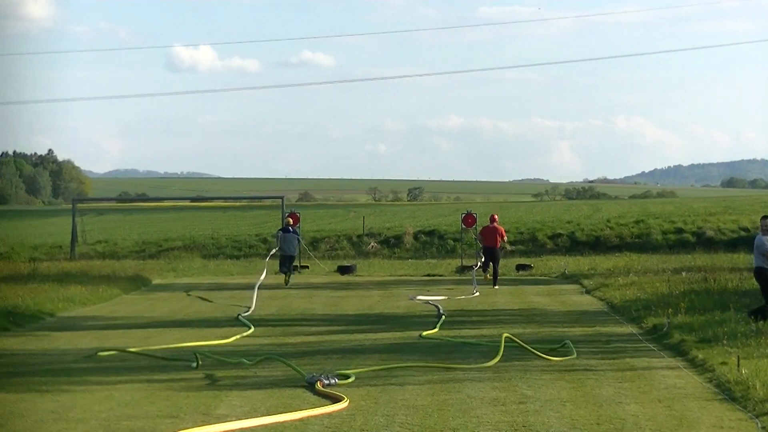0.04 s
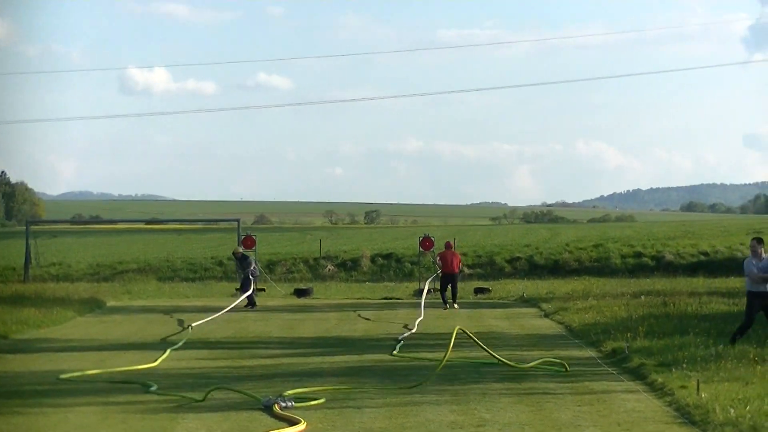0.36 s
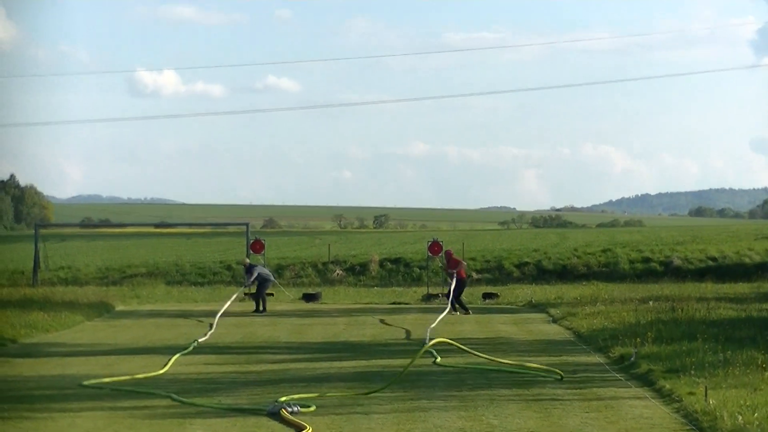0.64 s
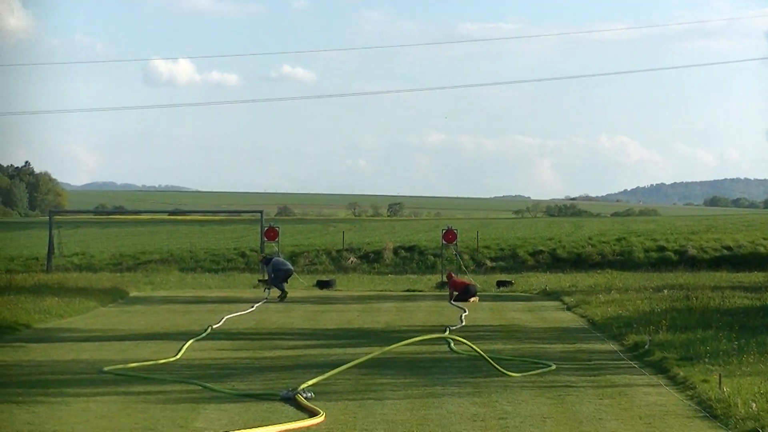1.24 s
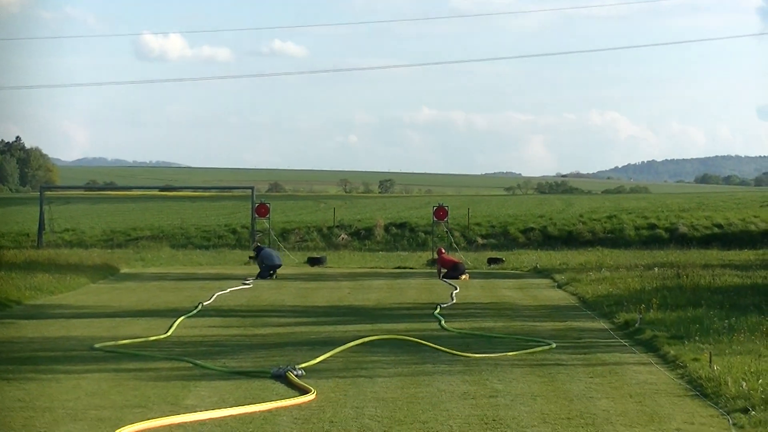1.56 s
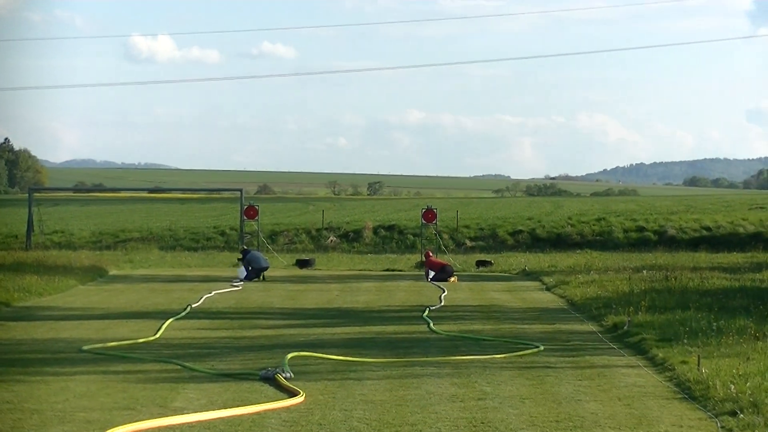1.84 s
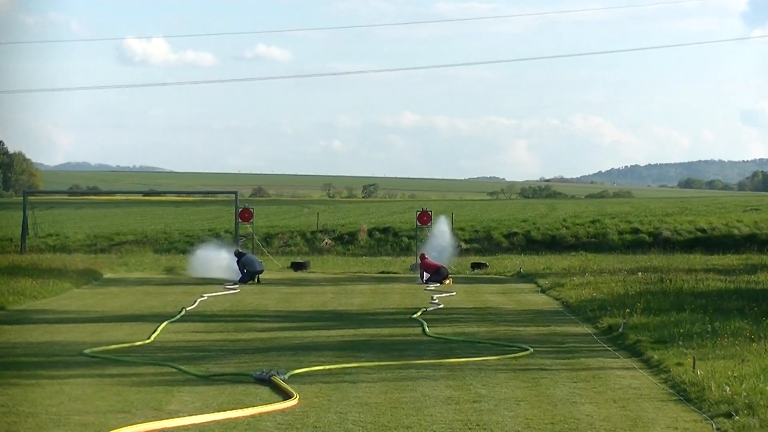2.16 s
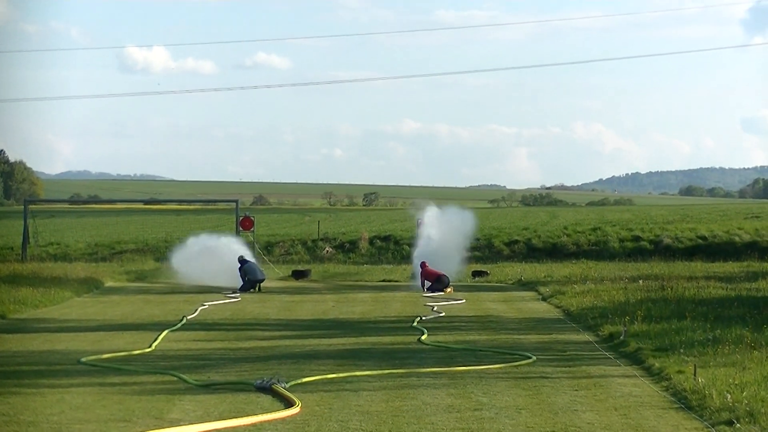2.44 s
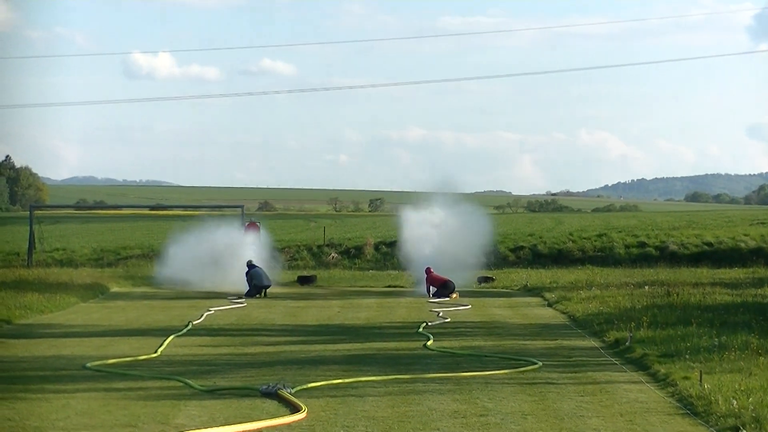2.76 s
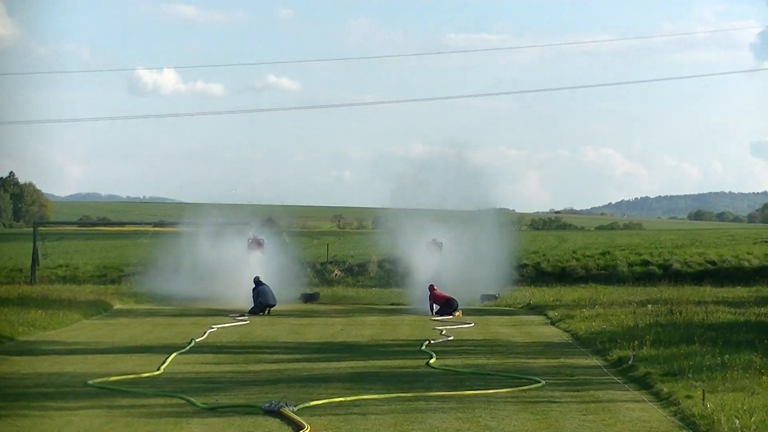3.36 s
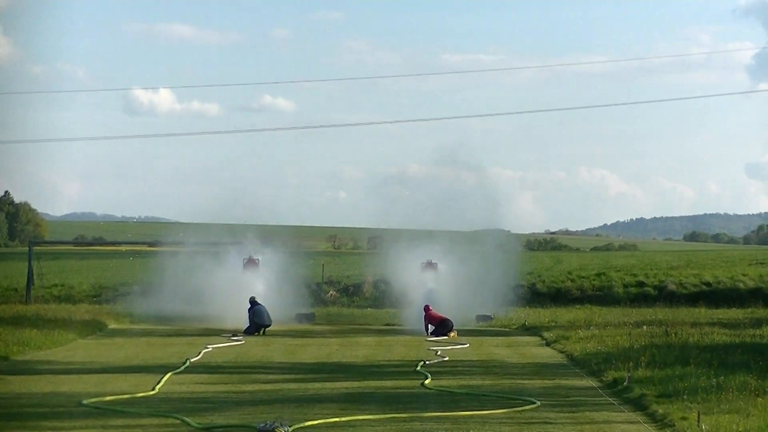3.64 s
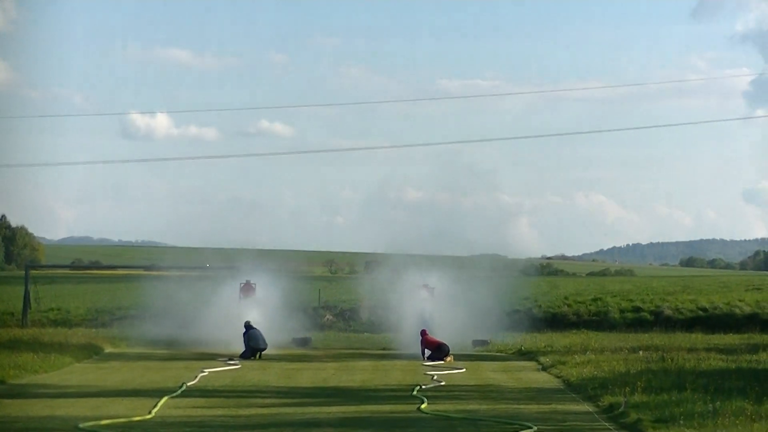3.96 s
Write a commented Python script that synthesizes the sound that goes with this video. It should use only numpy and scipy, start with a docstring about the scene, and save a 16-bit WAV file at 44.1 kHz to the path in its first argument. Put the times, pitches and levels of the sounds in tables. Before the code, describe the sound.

A loud pump engine runs flat out throughout, close by and slightly left, in an open field without echo. Its barely muffled exhaust makes a buzzing drone with rapid metallic crackle, rasp and hiss. For the first 2 seconds it runs a little rough, its pitch wavering and creeping up. From about 2 to 3 seconds the revs climb, then it holds a higher, steadier note until 4 seconds.

```python
"""An open field, the stereo microphone close to a four-cylinder pump engine running flat out through a
barely silenced exhaust. Each firing rings the pipe, with a metallic crack, a rasp of gas inside and a
hiss at the mouth. About two seconds in, as the hoses fill, the revs climb and the firing steadies.
Behind the engine the air carries only a faint low rumble."""
import sys
import numpy as np
from scipy import signal
from scipy.fft import rfft, irfft, next_fast_len
from scipy.io import wavfile

SR = 44100
rng = np.random.default_rng(int(sys.argv[2]) if len(sys.argv) > 2 else 0)


def put_to_file(sound):
    """Save the sound as 16-bit audio at rate SR, in the file named by the first command-line argument."""
    columns = np.atleast_2d(sound).T  # one column per channel
    safe = np.clip(columns, -1, 1)
    whole_steps = np.round(safe * 32767)
    wavfile.write(sys.argv[1], SR, whole_steps.astype(np.int16))


N = 176400
FFT_SIZE = next_fast_len(N + 8192, real=True)
FFT_HZ = np.arange(FFT_SIZE // 2 + 1) * SR / FFT_SIZE


def undb(db):
    """Decibels to gain."""
    return 10 ** (np.asarray(db) / 20)


def level(x, db):
    """Set the rms level."""
    return x * undb(db) / np.sqrt(np.mean(x ** 2))


def curve(table, column):
    """One column of a time table at every sample."""
    rows = np.array(table)
    return np.interp(np.arange(N) / SR, rows[:, 0], rows[:, column])


def colour(x, points, resonances=()):
    """Causal filter through (freq_hz, gain_db) points, with peaks and dips on top."""
    hz, rows = np.maximum(FFT_HZ, 1), np.array(points)
    db = np.interp(np.log(hz), np.log(rows[:, 0]), rows[:, 1])
    for centre, width, gain in resonances:
        db = db + gain / (1 + ((hz - centre) / width) ** 2) ** 1.5
    cepstrum = irfft(np.log(undb(db)), FFT_SIZE)
    cepstrum[1:FFT_SIZE // 2] *= 2  # fold to minimum phase
    cepstrum[FFT_SIZE // 2 + 1:] = 0
    return irfft(rfft(x, FFT_SIZE) * np.exp(rfft(cepstrum)), FFT_SIZE)[..., :N]


def pulses(times, sizes):
    """Clicks placed between samples by a windowed sinc."""
    at = times[:, None] * SR
    index = np.floor(at).astype(int) + np.arange(-7, 9)
    taps = sizes[:, None] * np.sinc(index - at) * np.sinc((index - at) / 8)
    inside = (index >= 0) & (index < N)
    return np.bincount(index[inside], taps[inside], N)


def fade(decay_ms):
    """An exponential decay, cut off at 20 ms."""
    ms = np.arange(SR // 50) * 1000 / SR
    return np.exp(-ms / decay_ms)


def stereo_noise(width, size=N):
    """White noise; width is the gain of side against mid."""
    mid, side = rng.standard_normal((2, size))
    return mid + width * side * np.array([[1], [-1]])


# Engine speed, climbing as the hoses fill: time_s, firing_hz
ENGINE_SPEED = [(0.0, 145.6), (0.25, 147.4), (0.45, 149.0), (0.65, 150.0), (0.85, 149.1), (1.02, 147.1),
                (1.17, 147.8), (1.35, 150.4), (1.5, 151.8), (1.72, 152.9), (1.92, 156.6), (2.1, 158.0),
                (2.3, 159.6), (2.55, 165.2), (2.8, 170.4), (3.02, 172.4), (3.5, 173.6), (4.0, 175.1)]
# Level rides and uneven running: time_s, drone_db, rasp_db, hiss_db, crack_db, buzz_db, roughness
ENGINE_RUN = [(0, -1, 5, 4.5, 0.5, 1.5, 1.1), (.7, 0.35, 1.5, 3.5, -4.5, 5, 0.53),
              (1.1, -1.1, 3, 3.5, -2.5, 2, 1.23), (1.5, 0, 2, 4.5, -5, 1.5, 0.77),
              (2, -1.5, 2.5, 5, -2, -3, 0.2), (2.5, -0.1, 1.5, 5.5, -1.5, -8, 0.1),
              (3.1, 0, 0, 1, 0, -6.5, 0), (4, -0.3, -0.5, 1.5, -2, -2.5, 0)]
# Cylinders in firing order: blow_db, late_ms, crack_low_revs_db, crack_high_revs_db
CYLINDER_TRAITS = [(0.25, 0.016, -10.5, -1), (1.1, -0.018, -17, -7.5), (0.3, -0.02, -7.5, -4),
                   (-0.5, -0.0077, -4.5, -8)]

def firings(low_revs_hz=148, high_revs_hz=173, jitter_ms=.03):
    """Four cylinders fire in turn; rough running scatters the timing and force of their blows."""
    firing_hz = curve(ENGINE_SPEED, 1)
    fired = np.cumsum(firing_hz) / SR
    count = np.arange(int(fired[-1]))
    at = np.interp(count + .5, fired, np.arange(N))
    cylinder = count % len(CYLINDER_TRAITS)
    blow_db, late_ms, low_db, high_db = np.array(CYLINDER_TRAITS)[cylinder].T
    time_scatter, blow_scatter, crack_scatter = rng.standard_normal((1000, 3))[count].T
    roughness = curve(ENGINE_RUN, 6)[at.astype(int)]
    revs = np.interp(firing_hz[at.astype(int)], [low_revs_hz, high_revs_hz], [0, 1])
    times = at / SR + (late_ms + jitter_ms * roughness * time_scatter) / 1000
    blow = undb(blow_db + roughness * blow_scatter)
    # the cracks swell and ebb over about 12 firings
    flutter = np.interp(count / 12, count, rng.standard_normal(len(count)))
    crack = undb(low_db + revs * (high_db - low_db) + 1.5 * crack_scatter + .8 * flutter)
    return times, cylinder, blow, crack


def open_end_reflections(x, round_trip_ms=.9, share=.5):
    """Inverted reflections from the open end spread each blow in time without colouring it."""
    lag = np.exp(-2j * np.pi * FFT_HZ * round_trip_ms / 1000)
    allpass = (lag - share) / (1 - share * lag)
    return irfft(rfft(x, FFT_SIZE) * allpass, FFT_SIZE)[:N]


# An exhaust blow from close by: freq_hz, gain_db
BLOW_SPECTRUM = [(60, -65), (150, -37.5), (200, -35.5), (290, -12.5), (360, -14), (440, -4.5), (900, -6.5),
                 (1700, -6.5), (2400, -12), (3200, -6.5), (4200, -32), (8000, -66), (16000, -71)]
# Resonances and cancellations of the pipe: freq_hz, width_hz, gain_db
PIPE_RESONANCES = [(515, 17.7, -25.5), (649.5, 28, -17.5), (790, 23, 4.5), (1057.6, 9.3, -16),
                   (1205, 124, 8), (1351, 28, -9.5), (1496, 20, -3.5), (1685, 122, 10), (1874, 112, -8),
                   (2100, 37, 7)]
# The hard edge of the blow: freq_hz, gain_db
BUZZ_SPECTRUM = [(300, -50), (1500, -22), (1950, 0), (2600, 1), (3100, -4), (3600, -8), (4200, -8),
                 (5000, -10), (6500, -21), (16000, -35)]
# Treble ringing of the tailpipe: freq_hz, width_hz, gain_db
TAILPIPE_RESONANCES = [(2500, 70, -4), (3250, 160, 4), (3660, 50, -7), (3950, 150, 3), (4480, 130, -4),
                       (5030, 130, 6), (5500, 250, -4), (6080, 220, 4), (7600, 180, 3), (9000, 350, 5),
                       (11500, 400, 2)]

def exhaust(times, blow, delay_ms=.1):
    """The blows ring the pipe as a pitched drone; their steep edges add a buzz."""
    train = open_end_reflections(pulses(times + delay_ms / 1000, blow))
    drone = level(colour(train, BLOW_SPECTRUM, PIPE_RESONANCES), -15)
    buzz = level(colour(train, BUZZ_SPECTRUM, TAILPIPE_RESONANCES), -30)
    return drone * undb(curve(ENGINE_RUN, 1)) + buzz * undb(curve(ENGINE_RUN, 5))


# The metallic crack of a firing, close up: freq_hz, gain_db
CRACK_SPECTRUM = [(150, -45), (450, -20), (1100, -8), (2200, -4), (3200, 1), (4200, -3), (6200, -6),
                  (9500, -7), (13000, -9), (16000, -15)]

def cracks(times, cylinder, strength):
    """Each cylinder repeats its own metallic crack, with a short tail, through the tailpipe."""
    envelope = fade(decay_ms=1.1) + .4 * fade(decay_ms=4)
    bursts = 0
    for k in range(len(CYLINDER_TRAITS)):
        burst = envelope * stereo_noise(width=.38, size=len(envelope))
        train = pulses(times[cylinder == k], strength[cylinder == k])
        bursts = bursts + signal.fftconvolve(train[None], burst)[:, :N]
    ringing = colour(bursts, CRACK_SPECTRUM, TAILPIPE_RESONANCES)
    return level(ringing, -27.5) * undb(curve(ENGINE_RUN, 4))


def gas_flow(times, strength, decay_ms):
    """A puff at each firing over a steady stream."""
    return 1 + signal.fftconvolve(pulses(times, strength), fade(decay_ms))[:N]


# Turbulent gas down inside the pipe: freq_hz, gain_db
RASP_SPECTRUM = [(100, -50), (250, -35), (400, -22), (700, -13), (1150, -3), (1350, -6), (1650, 1.5),
                 (1950, -3.5), (2600, -9), (3200, -5), (4400, -16), (8000, -38.5), (16000, -96)]

def rasp(times, blow):
    """Turbulence in the pipe pulses with the blows, loudest early on while the revs are low."""
    turbulence = stereo_noise(width=.12) * gas_flow(times, blow, decay_ms=9)
    return level(colour(turbulence, RASP_SPECTRUM), -24) * undb(curve(ENGINE_RUN, 2))


# Gas leaving the mouth of the pipe: freq_hz, gain_db
HISS_SPECTRUM = [(300, -48), (2000, -6), (3200, 2), (4500, -2.5), (6100, -1), (8400, -4), (10300, -3.5),
                 (13000, -7.5), (14200, -5), (16000, -20)]
# Its width at the microphone, most diffuse in the low treble: freq_hz, side_over_mid_db
HISS_SIDE = [(2000, -7.5), (3600, 0), (5400, -2), (7000, -8), (9500, -11), (11000, -30), (13500, -17),
             (16000, -20)]

def hiss(times, crack):
    """Gas hisses out of the mouth in time with the cracks."""
    mid, side = rng.standard_normal((2, N))
    noise = mid + colour(side, HISS_SIDE) * np.array([[1], [-1]])
    jet = noise * gas_flow(times, crack, decay_ms=1.9)
    ringing = colour(jet, HISS_SPECTRUM, TAILPIPE_RESONANCES)
    return level(ringing, -29.5) * undb(curve(ENGINE_RUN, 3))


# The open field behind the engine: freq_hz, gain_db
AIR_SPECTRUM = [(20, -3), (60, 1), (150, -5), (400, -25), (2000, -35)]

def field_air():
    """A faint, steady low rumble of open air."""
    return level(colour(stereo_noise(width=.55), AIR_SPECTRUM), -68.5)


# The engine across the microphone's two channels: freq_hz, left_minus_right_db
MIC_BALANCE = [(150, .5), (400, 2), (700, 3), (1400, 4), (2100, 0.5), (2650, 3), (3100, -.5), (3900, -0.5),
               (4400, 2), (6100, 5.5), (7700, 3.5), (8800, 1), (11500, 1.5), (12600, -8), (15000, 5.5)]

def at_microphone(engine):
    """The engine stands a little to the left, so most frequencies are louder on that side."""
    left = colour(engine[0], [(hz, db / 2) for hz, db in MIC_BALANCE])
    right = colour(engine[1], [(hz, -db / 2) for hz, db in MIC_BALANCE])
    return np.array([left, right])


def scene():
    """The engine close by in the open, with no walls to echo it."""
    times, cylinder, blow, crack = firings()
    engine = exhaust(times, blow) + cracks(times, cylinder, crack) + rasp(times, blow) + hiss(times, crack)
    return at_microphone(engine) + field_air()


def record(dry, top_hz=15900):
    """The recorder cuts the top treble steeply."""
    return signal.sosfilt(signal.ellip(10, .2, 80, top_hz, fs=SR, output="sos"), dry)


dry = scene()
out = record(dry)
put_to_file(out)
```